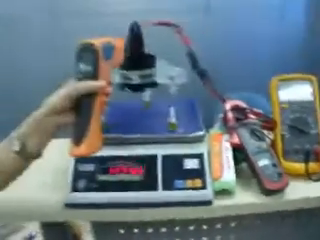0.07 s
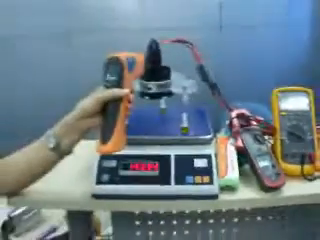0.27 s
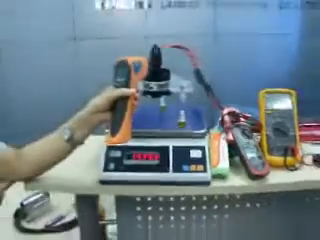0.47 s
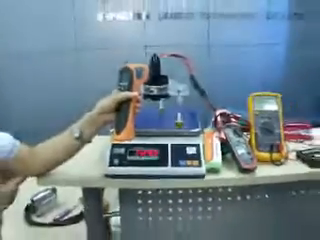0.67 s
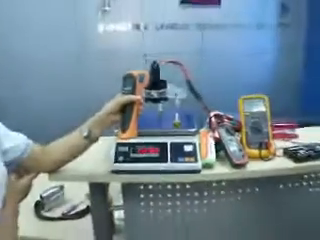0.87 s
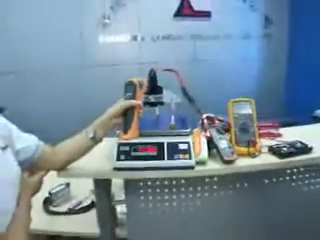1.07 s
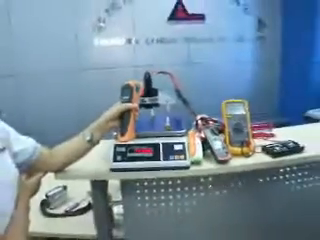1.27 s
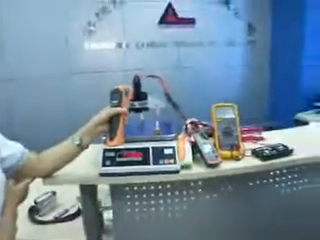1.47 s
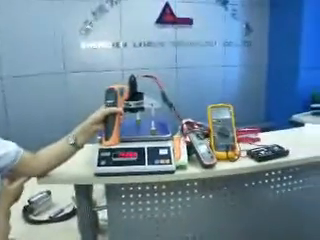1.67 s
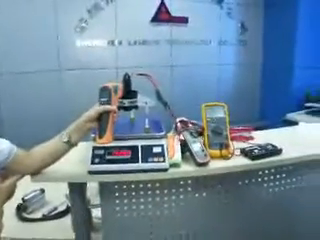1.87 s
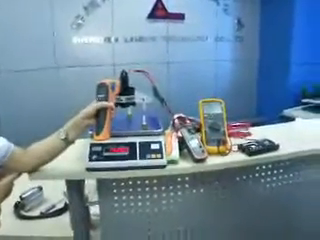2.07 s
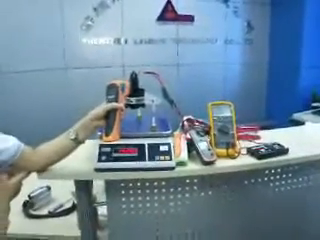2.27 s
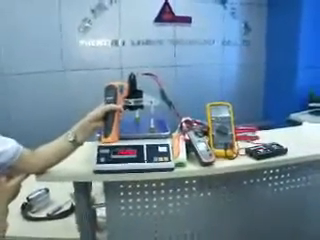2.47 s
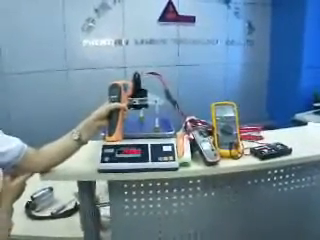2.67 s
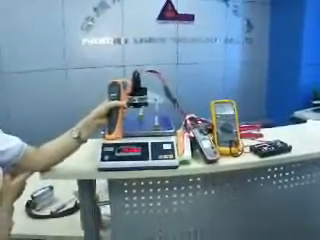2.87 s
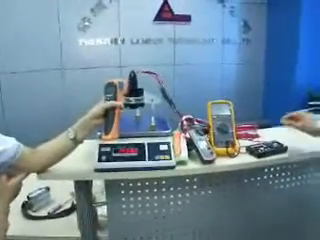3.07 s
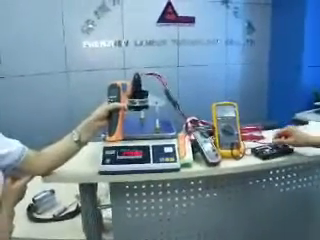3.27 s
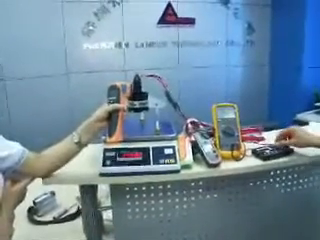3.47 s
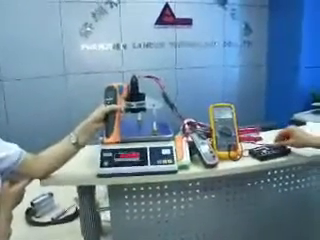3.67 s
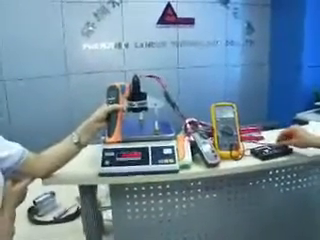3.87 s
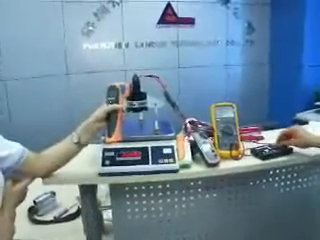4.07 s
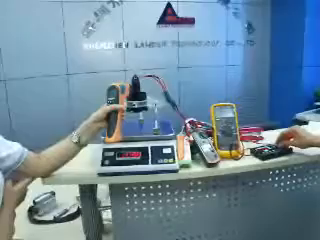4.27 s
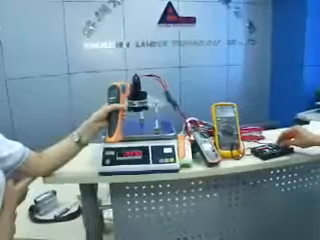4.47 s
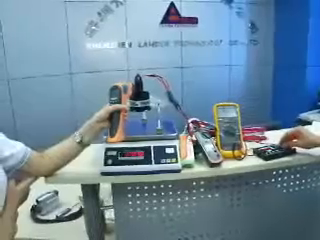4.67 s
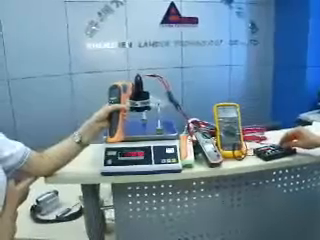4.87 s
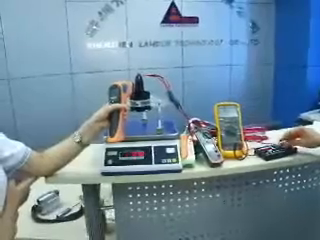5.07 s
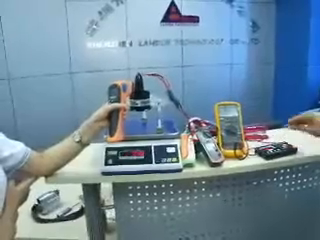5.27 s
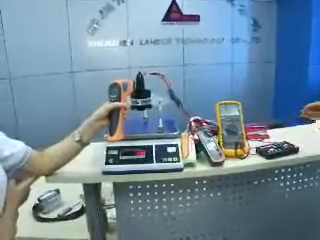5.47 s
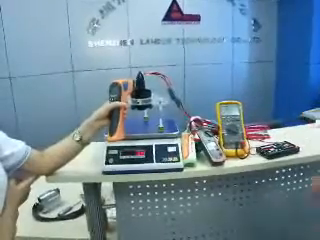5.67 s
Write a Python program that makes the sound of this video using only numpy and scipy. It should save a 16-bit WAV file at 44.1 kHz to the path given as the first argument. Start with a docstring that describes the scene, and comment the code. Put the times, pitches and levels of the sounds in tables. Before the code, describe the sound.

A small electric ducted fan screams at high speed, then is throttled back and spins down with a falling whine.

```python
"""A five-blade ducted fan screams on a bench, is throttled back, loses power and coasts down.
Shaft and blade tones waver in turbulent inflow, then glide down through duct and bench resonances.
Under them: jet hiss, wash and bench rumble, room noise, a faint whistle, a squeak after the power cut.
A small camera nearby is bumped twice. It samples at 16 kHz and holds each sample,
which mirrors the tones about 8 kHz."""
import sys
import numpy as np
from scipy import signal
from scipy.fft import rfft, irfft
from scipy.io import wavfile
from scipy.ndimage import uniform_filter1d, map_coordinates

SR = 44100
rng = np.random.default_rng(int(sys.argv[2]) if len(sys.argv) > 2 else 0)


def file_out(sig):
    """Save sig as 16-bit WAV at sys.argv[1]."""
    # one column per channel
    cols = np.atleast_2d(sig).T
    # limit, then scale
    lim = np.clip(cols, -1, 1)
    pcm = np.round(lim * 32767).astype(np.int16)
    wavfile.write(sys.argv[1], SR, pcm)


N = 252692
TIME_S = np.arange(N) / SR
BLADES, POWER_CUT_S, CAMERA_HZ = 5, 4.425, 16001.5

# Shaft speed at full throttle: time_s, shaft_hz
FULL_SPEED = [(0, 770.1), (.35, 771.8), (1.05, 771.6), (1.4, 770.2), (1.8, 770.1), (2.4, 769.1), (3, 768.3),
              (3.35, 771.5), (3.6, 770.6)]


def undb(db):
    return 10 ** (np.asarray(db) / 20)


def unit_rms(x):
    return x / np.sqrt(np.mean(x ** 2))


def curves(table):
    """Columns interpolated per sample; the first is time_s."""
    time_s, *columns = np.transpose(table)
    return [np.interp(TIME_S, time_s, column) for column in columns]


def noise(spectrum):
    """Unit-rms noise shaped by rows of freq_hz, relative density_db."""
    freq_hz, density_db = np.transpose(spectrum)
    bins_hz = np.fft.rfftfreq(N, 1 / SR) + 1
    gain = undb(np.interp(np.log(bins_hz), np.log(freq_hz), density_db, left=-60, right=density_db[-1]))
    return unit_rms(irfft(rfft(rng.standard_normal(N)) * gain, N))


def drift(rate_hz):
    """Smooth unit-rms random signal."""
    span = max(int(SR / rate_hz), 1)
    return unit_rms(uniform_filter1d(uniform_filter1d(rng.standard_normal(N), span), span))


def flutter(rate_hz):
    """Complex drift: shakes amplitude and phase."""
    return drift(rate_hz) + 1j * drift(rate_hz)


def room_noise(level_db=-41.5):
    """Steady room hiss with a faint whistle."""
    # Hiss spectrum: freq_hz, density_db
    spectrum = [(400, -8), (700, -12), (1060, -6), (1600, 2), (1840, 9), (2100, 2), (3600, -8), (4200, 2),
                (5000, 6), (7900, 0)]
    # Whistle: pitch_hz, level_db
    whistle = [(4910, -58)]
    room = undb(level_db) * noise(spectrum)
    for pitch_hz, whistle_db in whistle:
        room += np.sqrt(2) * undb(whistle_db) * np.sin(2 * np.pi * pitch_hz * TIME_S)
    return room


def bench_rumble(level_db):
    """Bench and room rumble, slowly wavering."""
    # Rumble spectrum: freq_hz, density_db
    spectrum = [(50, -1), (85, 0.5), (130, -2), (300, -6.5), (600, -15.5), (1200, -28.5)]
    return undb(level_db + 1.3 * drift(2.9)) * noise(spectrum)


def camera_bumps():
    """A hand shifts on the camera: dull rumbles with sharp onsets."""
    # Knocks, in two clusters: start_s, peak_db, t60_s
    knocks = [(4.411, -26.5, 0.21), (4.434, -30.5, 0.32), (4.494, -31, 0.18), (4.688, -27.5, 0.68),
              (4.779, -41, 0.66)]
    # Knock spectrum: freq_hz, density_db
    spectrum = [(30, -21), (150, 5.5), (400, -4.5), (1200, -21), (3000, -14)]
    envelope = np.zeros(N)
    for start_s, peak_db, t60_s in knocks:
        age_s = np.clip(TIME_S - start_s, 0, None)
        envelope += undb(peak_db - 60 * age_s / t60_s) * (TIME_S >= start_s)
    return envelope * noise(spectrum)


def wash_rumble(level_db):
    """Gusty low rumble of the fan's wash."""
    # Wash spectrum: freq_hz, density_db
    spectrum = [(15, 9.5), (40, -2), (70, 0.5), (110, -11), (250, -19)]
    return undb(level_db + 2.2 * drift(5)) * noise(spectrum)


def jet_hiss(level_db):
    """Turbulent jet: bright hiss with fast and slow flicker."""
    # Jet spectrum: freq_hz, density_db
    spectrum = [(100, -33), (300, -23), (560, -7.5), (670, -47), (850, -8.5), (1170, -13), (2200, -9.5),
                (3560, -4.5), (5000, -1), (6500, 6), (7400, 7), (7900, 5)]
    return undb(level_db + 0.99 * drift(35) + 1.23 * drift(4.7)) * noise(spectrum)


def add_squeak(jet, peak_s=4.505, width_s=.022, pitch_hz=2870, level_db=-37, puff_db=3):
    """A short squeak; the hiss swells with it."""
    swell = np.exp(-((TIME_S - peak_s) / width_s) ** 2)
    squeak = np.sqrt(2) * undb(level_db) * swell * np.sin(2 * np.pi * pitch_hz * TIME_S)
    return jet * undb(puff_db * swell) + squeak


def add_echoes(wave, shaft_hz, wall_s=.011, wall_db=-5, tail_t60_s=.6, tail_db=-2.5):
    """Wall echo and room tail trail a falling tone at its older pitch; gated off at steady speed."""
    delay_s = np.arange(int(tail_t60_s * SR)) / SR
    tail = rng.standard_normal(len(delay_s)) * undb(-60 * delay_s / tail_t60_s) * (delay_s > wall_s)
    response = undb(tail_db) * tail / np.sqrt(np.sum(tail ** 2))
    lag = int(wall_s * SR)
    response[lag] = undb(wall_db)
    pitch_gap = np.roll(shaft_hz, lag) / shaft_hz - 1
    gate = np.clip(pitch_gap / .005, 0, 1) * (np.arange(N) > lag)
    return wave + gate * signal.fftconvolve(wave, response)[:N]


def resonance_db(pitch_hz):
    """Duct and bench resonances lift a tone gliding through."""
    # Resonances: centre_hz, width_hz, lift_db
    modes = [(1870, 150, 19), (2950, 180, 8), (4050, 350, 7), (6300, 280, 9), (7700, 350, 6)]
    return sum(lift_db * np.exp(-((pitch_hz - centre_hz) / width_hz) ** 2)
               for centre_hz, width_hz, lift_db in modes)


def shaft_speed_hz(knob_start_s=3.829, knob_turn_s=.212, low_hz=335.5, rotor_lag_s=.138):
    """The rotor lags the throttle knob; unpowered, air drag and friction slow it."""
    drag_per_turn, crossover_hz = .0075, 50  # friction equals drag at crossover_hz
    full_hz, = curves(FULL_SPEED)
    knob = np.clip((TIME_S - knob_start_s) / knob_turn_s, 0, 1)
    pole = np.exp(-1 / (rotor_lag_s * SR))
    lagged_knob = signal.lfilter([1 - pole], [1, -pole], knob)
    driven_hz = full_hz - lagged_knob * (full_hz - low_hz)
    cut_angle = np.arctan(driven_hz[int(POWER_CUT_S * SR)] / crossover_hz)
    coast_hz = crossover_hz * np.tan(cut_angle - crossover_hz * drag_per_turn * (TIME_S - POWER_CUT_S))
    return np.where(TIME_S < POWER_CUT_S, driven_hz, coast_hz)


def shaft_harmonic(turns, multiple, roughness, flutter_hz):
    """One shaft multiple; eddies through the blades spread it into a skirt, more so off throttle."""
    shaft_hz = np.gradient(turns) * SR
    stall = .17 * np.clip((1 - shaft_hz / shaft_hz[0]) / .05 - .1, 0, 1)
    modulation = 1 - stall + (roughness + stall) * flutter(flutter_hz)
    carrier = -np.sqrt(2) * np.exp(2j * np.pi * multiple * turns)
    return modulation * carrier * (multiple * shaft_hz < CAMERA_HZ / 2)


def add_swirl(wave, turns, multiple, hump_db):
    """Eddies turning with the rotor are cut less often: a noisy hump 1.1 % below the tone."""
    downshift = np.exp(-2j * np.pi * .011 * multiple * turns)
    return wave * (1 + undb(hump_db) * flutter(22 * multiple) * downshift)


def fan_rotor():
    """Imbalance hums once a turn, blade pressure dips five times; unequal blades add other multiples."""
    # Full-throttle tones, fading as reflections meet: time_s, shaft_db, blade1_db, blade2_db
    loaded_tones = [(0.0,-34,-18.5,-24), (0.05,-34.5,-20.5,-26), (0.27,-36.5,-15.5,-22),
                    (0.39,-33,-18.5,-27.5), (0.65,-31.5,-17.5,-20), (0.76,-33,-22.5,-19.5),
                    (1.05,-32,-16.5,-23.5), (1.24,-31.5,-24.5,-25.5), (1.3,-31,-21.5,-29.5),
                    (1.39,-31.5,-20.5,-20), (1.99,-32.5,-17.5,-24), (2.33,-31,-25.5,-23),
                    (2.39,-32.5,-17.5,-20), (2.45,-32,-33,-20.5), (2.49,-31.5,-22,-16.5),
                    (2.53,-34.5,-17.5,-21), (3.09,-34,-20.5,-21), (3.31,-30.5,-28.5,-18),
                    (3.36,-31,-30,-29), (3.4,-29.5,-21,-19.5), (3.58,-30,-21,-26.5), (3.69,-31,-28,-17.5),
                    (3.73,-29.5,-25,-21), (3.85,-32,-23.5,-20.5)]
    # Off-throttle tones: multiple, level_db, loss_db_per_octave, cut_loss_db, resonance_share,
    # roughness, flutter_hz
    slowing_tones = [(1, -40, 10, 10, 0, .05, 53), (5, -32.5, 8.5, -1, .12, .12, 50),
                     (10, -25, 11.5, 8, .4, .2, 120), (15, -23, 10.5, 12, 1, .05, 150),
                     (20, -41, 6, 8, .5, .15, 95)]
    # Unequal-blade tones at full speed: multiple, level_db
    uneven_tones = [(2, -51), (3, -46.5), (4, -84), (6, -42), (7, -38), (8, -41), (9, -37)]
    shaft_hz = shaft_speed_hz()
    turns = np.cumsum(shaft_hz) / SR
    speed_ratio = shaft_hz / shaft_hz[0]
    speed_lost = 1 - shaft_hz / FULL_SPEED[-1][1]
    unloaded = np.clip((speed_lost - .004) / .1, 0, 1)  # blades shed their load over a 10 % drop
    unpowered = np.clip((TIME_S - POWER_CUT_S) / .04, 0, 1)
    loaded_db = curves(loaded_tones)
    tones = []
    for k, row in enumerate(slowing_tones):
        multiple, level_db, loss_db_per_octave, cut_loss_db, resonance_share, roughness, flutter_hz = row
        level_db = level_db + loss_db_per_octave * np.log2(speed_ratio) - cut_loss_db * unpowered
        level_db += resonance_share * resonance_db(multiple * shaft_hz)
        if k < len(loaded_db):
            dip_db = .5 * k * (drift(18) ** 2 - 1)  # brief dips, deeper for higher tones
            level_db = unloaded * level_db + (1 - unloaded) * (loaded_db[k] - dip_db)
        tones.append(undb(level_db) * shaft_harmonic(turns, multiple, roughness, flutter_hz))
    hum, blade1, blade2, blade3, blade4 = tones
    scream = add_swirl(blade1, turns, BLADES, hump_db=-24)
    scream += add_swirl(blade2, turns, 2 * BLADES, hump_db=-11) + blade3 + blade4
    for multiple, level_db in uneven_tones:
        gain = speed_ratio ** 6 * undb(level_db + 0.37 * drift(36))
        scream += gain * shaft_harmonic(turns, multiple, roughness=0.17, flutter_hz=40)
    return hum.real + add_echoes(scream.real, shaft_hz)


def scene():
    """Fan, air noise, room and bumps in mono."""
    # Noise levels: time_s, jet_db, wash_db, bench_db
    levels = [(0, -17.5, -36, -46), (.4, -21.5, -37.5, -49), (1.1, -22, -34, -54.5),
              (1.8, -20, -34.5, -45.5), (2.4, -18, -37.5, -44.5), (2.9, -20.5, -35, -47),
              (3.8, -16.5, -37, -42.5), (4.1, -21.5, -39.5, -48), (4.33, -26, -40, -46.5),
              (4.5, -23.5, -39, -42.5), (4.7, -27.5, -41, -44.5), (5.04, -32, -39.5, -42.5),
              (5.27, -39.5, -39.5, -39.5), (5.73, -63, -51, -37.5)]
    jet_db, wash_db, bench_db = curves(levels)
    air = add_squeak(jet_hiss(jet_db)) + wash_rumble(wash_db)
    background = bench_rumble(bench_db) + room_noise()
    return (air + background + fan_rotor() + camera_bumps())[None]


def record(dry):
    """Camera: anti-alias filter, sample and hold, output low-pass."""
    passband_hz, top_hz = 7900, 12740
    band_limited = signal.sosfilt(signal.ellip(8, .2, 60, passband_hz, fs=SR, output="sos"), dry[0])
    tick = np.floor(np.arange(N) * CAMERA_HZ / SR)
    held = map_coordinates(band_limited, [tick * SR / CAMERA_HZ], order=5, mode="nearest")
    return signal.sosfilt(signal.ellip(14, .3, 70, top_hz, fs=SR, output="sos"), held)[None]


dry = scene()
out = record(dry)
file_out(out)
```